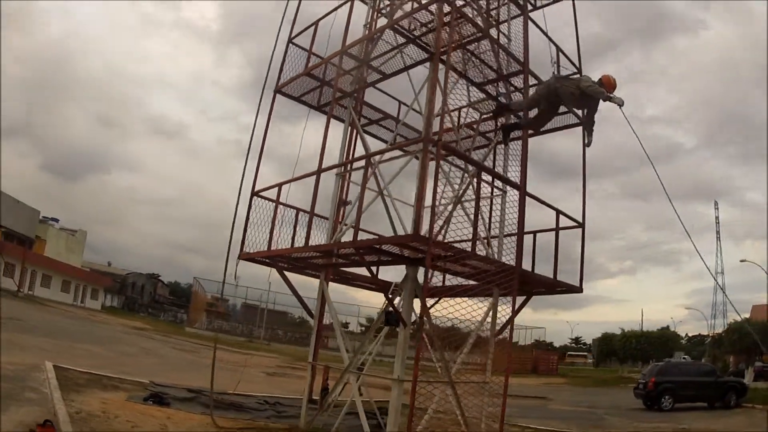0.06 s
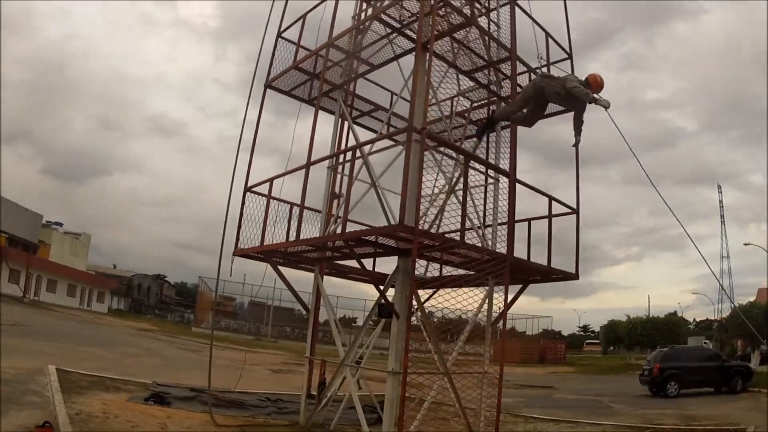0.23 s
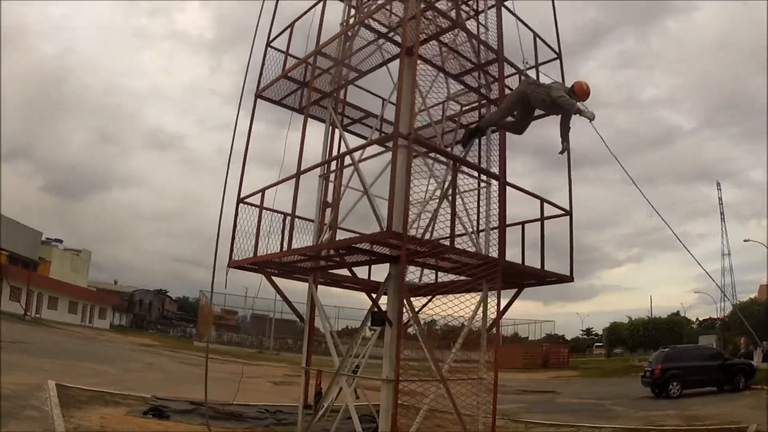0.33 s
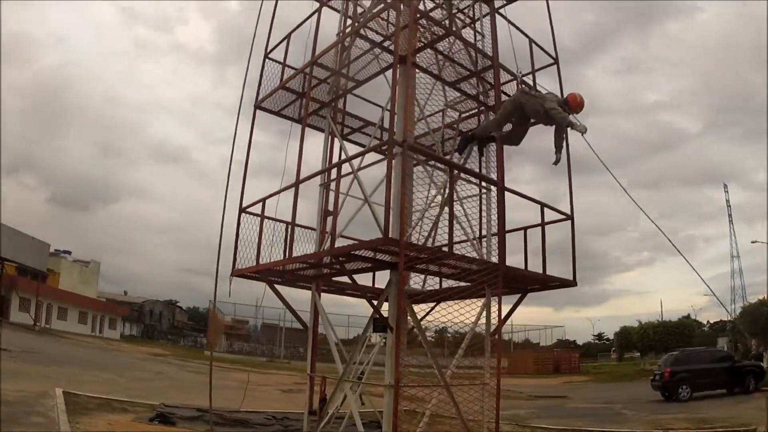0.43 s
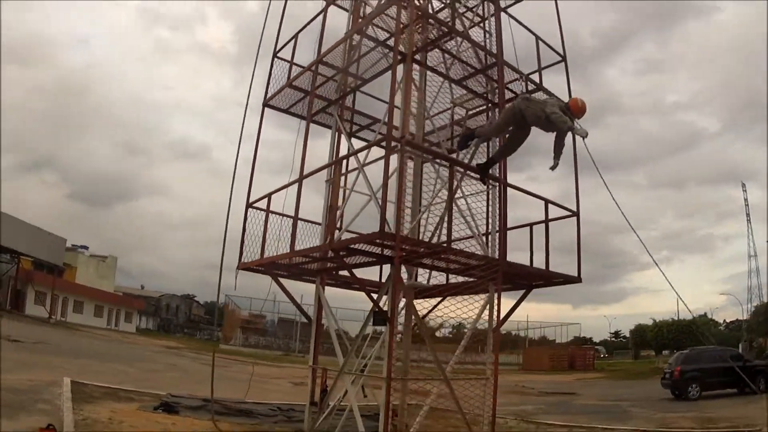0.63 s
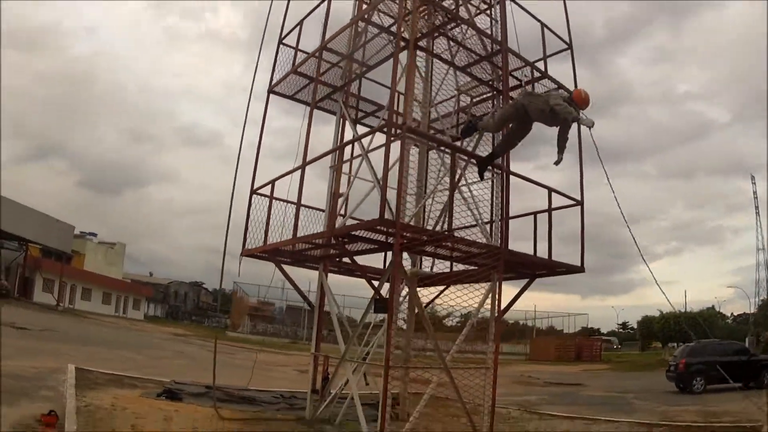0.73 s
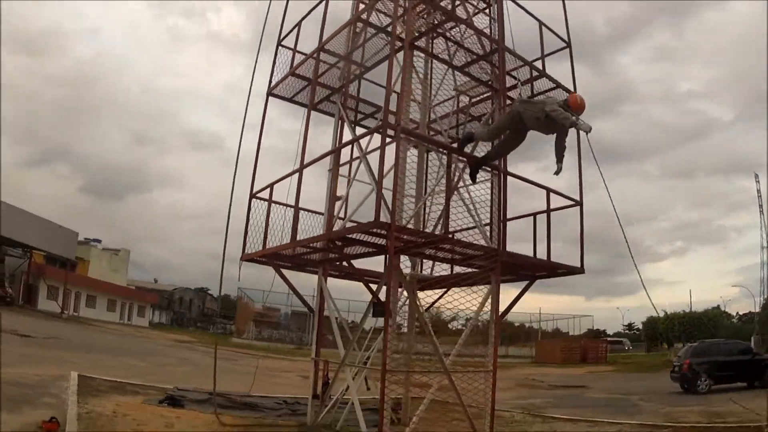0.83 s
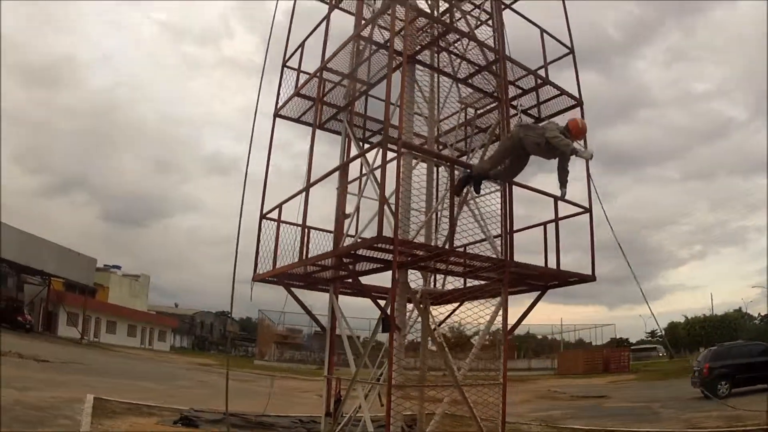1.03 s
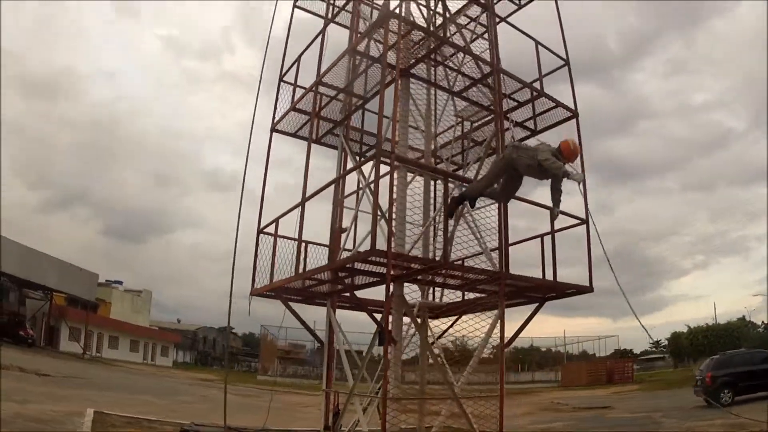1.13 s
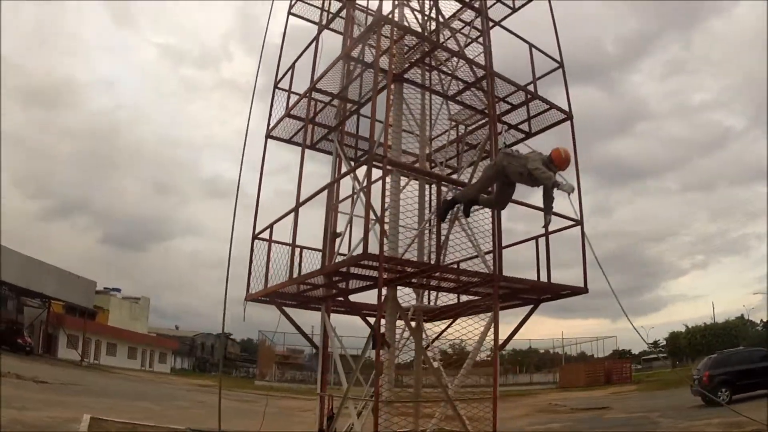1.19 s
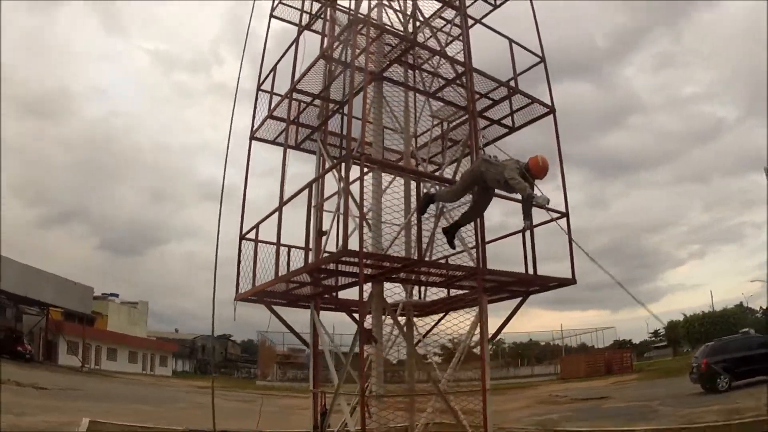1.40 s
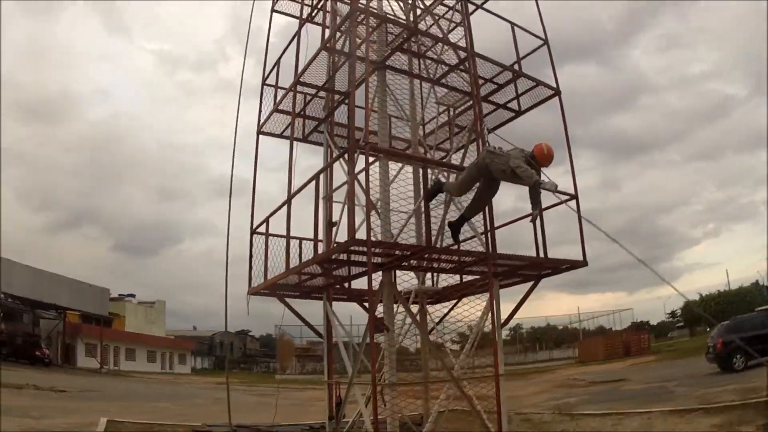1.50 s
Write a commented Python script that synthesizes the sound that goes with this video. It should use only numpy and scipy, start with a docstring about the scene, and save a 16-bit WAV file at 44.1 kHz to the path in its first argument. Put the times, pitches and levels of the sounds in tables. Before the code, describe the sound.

Something hard knocks loudly on a hand-held camera at about 0.2 seconds, right at the microphone, with a brief ring, a low thud and a gritty, metallic edge. Fingers bump the case softly until about 0.9 seconds. A second, much lighter knock comes at about 1.25 seconds. Throughout, quiet, uneven wind and handling rumble runs with a faint, distant outdoor hiss.

```python
"""Outdoors, at the microphone of a hand-held camera: wind and handling rumble under a faint, far hiss.
Right at the microphone something hard knocks twice on the case, once loudly and once lightly.
The case rings and the camera thuds on its mount; between the knocks fingers bump it softly.
The recorder holds each sample of a slow clock, which mirrors every sound into the treble
as a gritty, metallic edge."""
import sys
import numpy as np
from scipy import signal
from scipy.fft import rfft, irfft
from scipy.io import wavfile

SR = 44100
rng = np.random.default_rng(int(sys.argv[2]) if len(sys.argv) > 2 else 0)


def file_out(sig):
    """Save sig as 16-bit WAV at sys.argv[1]."""
    # one column per channel
    cols = np.atleast_2d(sig).T
    # limit, then scale
    lim = np.clip(cols, -1, 1)
    pcm = np.round(lim * 32767).astype(np.int16)
    wavfile.write(sys.argv[1], SR, pcm)


N = 68355


def from_db(db):
    """Decibels to gain."""
    return 10 ** (np.asarray(db) / 20)


def unit_rms(x):
    """Scale to an rms of 1."""
    return x / np.sqrt(np.mean(x ** 2) + 1e-20)


def butterworth(x, order, corner_hz, kind="low"):
    """Low-pass or high-pass filter."""
    return signal.sosfilt(signal.butter(order, corner_hz, kind, fs=SR, output="sos"), x)


def clicks(times, db):
    """One impulse at each time, shared between neighbouring samples."""
    out, at = np.zeros(N), np.asarray(times) * SR
    whole = at.astype(int)
    np.add.at(out, whole, from_db(db) * (1 - at % 1))
    np.add.at(out, whole + 1, from_db(db) * (at % 1))
    return out


def ring(x, hz, t60):
    """One mode: a unit click starts a sine of height 1 that falls 60 dB in t60 seconds."""
    decay = np.exp(-np.log(1000) / (t60 * SR))
    turn = 2 * np.pi * hz / SR
    return signal.lfilter([0, np.sin(turn)], [1, -2 * decay * np.cos(turn), decay * decay], x + 1e-18)


def noise(spectrum):
    """Steady noise of a given colour, rms 1."""
    hz, db = np.transpose(spectrum)
    bins_hz = np.maximum(np.fft.rfftfreq(N, 1 / SR), 1)
    colour = from_db(np.interp(np.log(bins_hz), np.log(hz), db))
    return unit_rms(irfft(rfft(rng.standard_normal(N)) * colour, N))


def distant_hiss(level_db=-63):
    """A faint, steady hiss from far off."""
    # colour of the hiss: (frequency [Hz], relative level [dB])
    spectrum = [(100, -17.5), (300, 13), (520, 7), (680, 4.5), (820, 5), (1200, 2.5), (1800, 3.5),
                (2250, 6.5), (2700, -1.5), (3450, -3.5), (3900, -9.5)]
    return from_db(level_db) * noise(spectrum)


def rumble():
    """Wind and handling rumble unevenly on the microphone."""
    # rise and fall of the rumble: (time [s], level [dB])
    swells = [(0, -48), (.17, -48), (.3, -48.5), (.345, -54.5), (.52, -48), (.555, -48), (.6, -42.5),
              (.76, -51), (0.879, -46), (.926, -51.5), (.988, -49.5), (1.06, -56.5), (1.2, -49.5),
              (1.326, -48), (1.44, -52.5), (1.55, -49)]
    # colour of the rumble: (frequency [Hz], relative level [dB])
    spectrum = [(10, -50.5), (22, 7.5), (42, -0.5), (70, -3), (125, -11.5), (230, -20.5), (400, -38.5),
                (800, -67.5)]
    level_db = np.interp(np.arange(N) / SR, *np.transpose(swells))
    return from_db(level_db) * noise(spectrum)


def rub(peak_s=.337, width_s=.015, gain_db=-69.5):
    """A brief, faint rub: friction noise in two resonances swells and fades."""
    # resonances of the rub: (frequency [Hz], bandwidth [Hz], relative level [dB])
    resonances = [(1890, 300, 9), (3100, 160, -4)]
    t, friction = np.arange(N) / SR, rng.standard_normal(N)
    tone = sum(from_db(db) * unit_rms(signal.lfilter(*signal.iirpeak(hz, hz / width, fs=SR), friction))
               for hz, width, db in resonances)
    swell = np.exp(-.5 * ((t - peak_s) / width_s) ** 2)
    return from_db(gain_db) * tone * swell


def grit(times, db, t60=.016):
    """A burst of noise that dies within milliseconds of each contact."""
    decay = np.exp(-np.log(1000) / (t60 * SR))
    envelope = signal.lfilter([1], [1, -decay], clicks(times, db) + 1e-18)
    return envelope * rng.standard_normal(N)


def case_ring(times, db, place):
    """The case rings, neighbouring modes in opposite sense; the place struck sets their mix."""
    # modes of the case: (frequency [Hz], gain struck at corner [dB], gain struck on panel [dB], t60 [s])
    modes = [(219, -13.5, -15, 0.026), (360, 2, -1.03, 0.0039), (535, -30.5, 6, .028),
             (749, -9, -3.5, 0.027), (825.4, -1.5, -18, 0.017), (1037, -12, -33, 0.029),
             (1180, -3.5, -15, 0.015), (1566, -4, .5, 0.014), (1715, -9.5, -0.74, 0.018),
             (1909, -10.5, -18.5, .028), (1970, -15.5, -9.5, .018), (2366, 0.5, -10.5, 0.016),
             (2577, -31.5, -8, 0.009)]
    return sum((-1) ** k * ring(clicks(times, db + corner_db * (1 - place) + panel_db * place), hz, t60)
               for k, (hz, corner_db, panel_db, t60) in enumerate(modes))


def finger_bumps(grit_boost_db=6.5):
    """Soft fingers scuff the case and reach mostly its low modes."""
    # finger contacts: (time [s], strength [dB], softness as a low-pass corner [Hz])
    touches = [(.131, -63, 910), (.1932, -45, 800), (.2700, -39.5, 600), (.4949, -44.5, 650),
               (.5779, -40, 790), (.616, -54, 650), (.662, -49.5, 1180), (.918, -53, 1194),
               (.945, -62, 500)]
    bumps = np.zeros(N)
    for time, db, soft_hz in touches:
        contact = case_ring([time], db, place=.8) + grit([time], db + grit_boost_db)
        bumps += butterworth(contact, order=1, corner_hz=soft_hz)
    return butterworth(bumps, order=4, corner_hz=1559)


def mount_thuds():
    """The whole camera shakes on its mount for a few low cycles."""
    # jolts to the camera: (time [s], strength [dB])
    jolts = [(0.196, -31.5), (0.2195, -9.5), (.497, -44), (.583, -43), (.666, -58.5), (.865, -47.5),
             (1.2449, -41)]
    # modes of the mount: (frequency [Hz], gain [dB], t60 [s])
    modes = [(114.2, -1, 0.096), (140, -3.5, 0.06)]
    push = clicks(*np.transpose(jolts))
    shake = sum(from_db(db) * ring(push, hz, t60) for hz, db, t60 in modes)
    return butterworth(shake, order=1, corner_hz=33, kind="high")


def knocks():
    """Two knocks right at the microphone, each a quick run of hard, gritty contacts that ring the case."""
    # hard contacts: (time [s], strength [dB], place struck [0 stiff corner to 1 panel], grit level [dB])
    contacts = [(.2171, -23.5, 0.71, -49), (.2199, -9.8, 0.36, -32.5), (.2204, -4, 0.095, -13.5),
                (.2238, -32, .49, -35), (1.2451, -28, 0.896, -58), (1.2460, -29.5, 0.91, -53.5),
                (1.2498, -51, 0.44, -72)]
    times, db, place, grit_db = np.transpose(contacts)
    ringing = butterworth(case_ring(times, db, place), order=6, corner_hz=2976)
    return ringing + grit(times, grit_db)


def scene():
    """Close contacts and the open air, in mono at the camera's microphone."""
    return (knocks() + mount_thuds() + finger_bumps() + rub() + rumble() + distant_hiss())[None]


def record(dry, clock_hz=8000, clip_level=.8, cutoff_hz=15400):
    """The recorder samples on a slow clock, clips, holds each sample as a stair step and cuts the top."""
    slow = signal.resample_poly(dry, clock_hz, SR, axis=1)
    clipped = np.clip(slow, -clip_level, clip_level)
    held = np.repeat(clipped, 6, axis=1)   # the steps mirror the sound into the treble
    steps = signal.resample_poly(held, SR, 6 * clock_hz, axis=1)[:, :N]
    return signal.sosfilt(signal.ellip(8, .3, 70, cutoff_hz, fs=SR, output="sos"), steps)


dry = scene()
out = record(dry)
file_out(out)
```